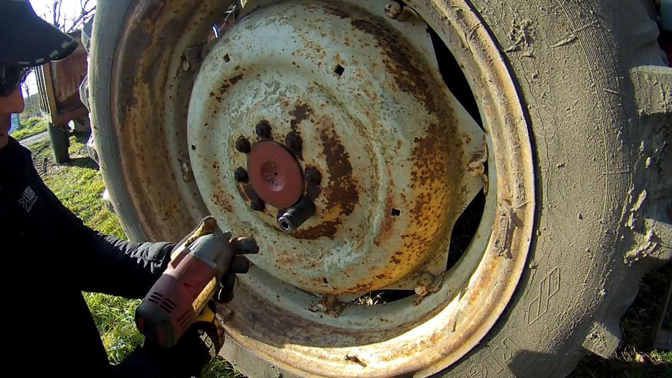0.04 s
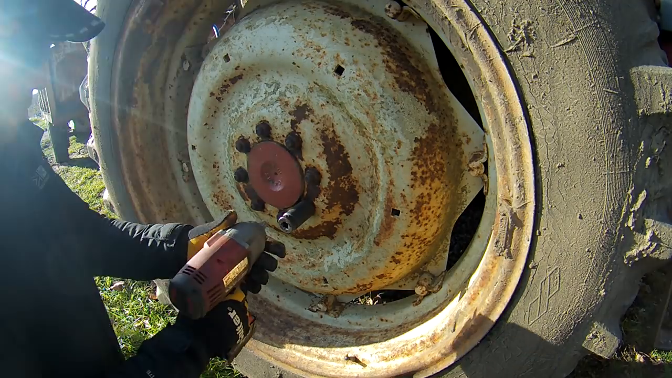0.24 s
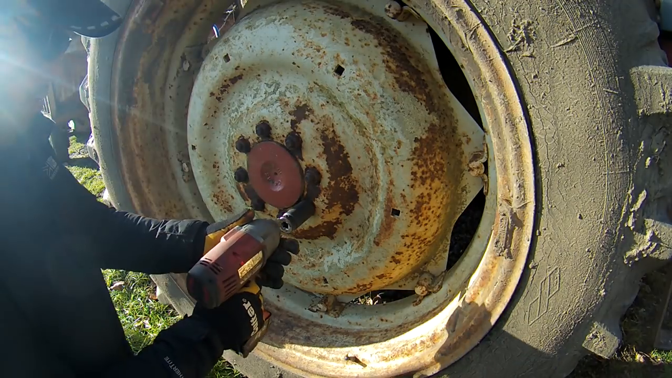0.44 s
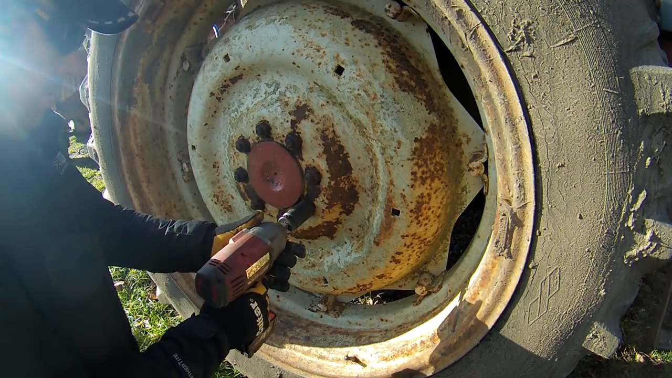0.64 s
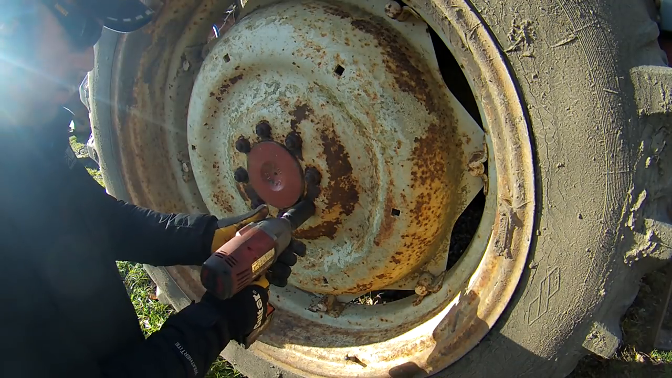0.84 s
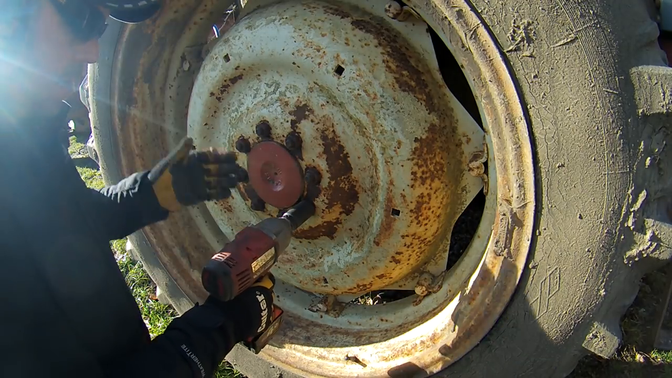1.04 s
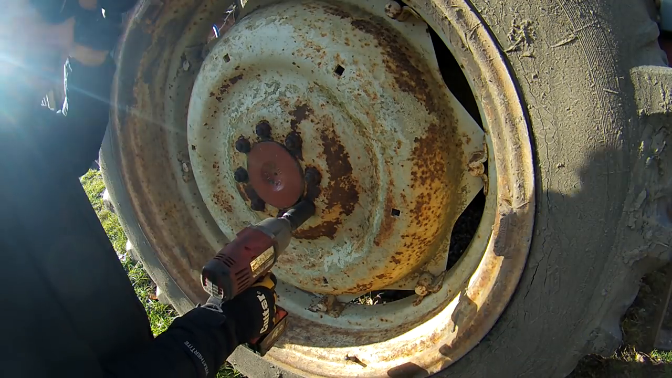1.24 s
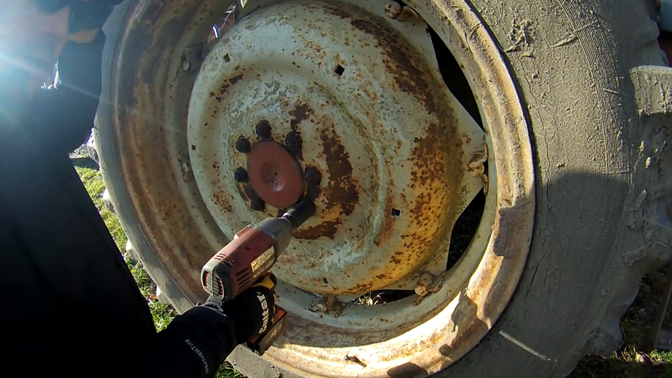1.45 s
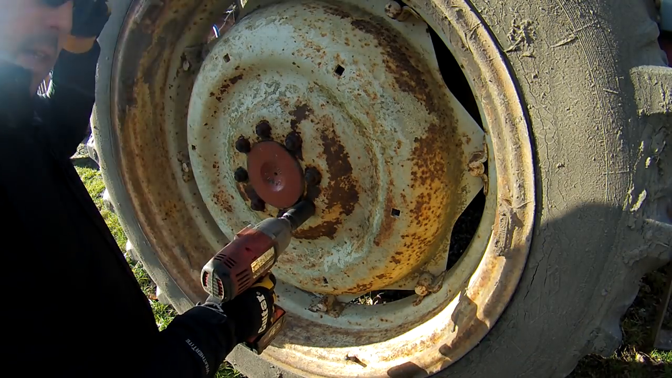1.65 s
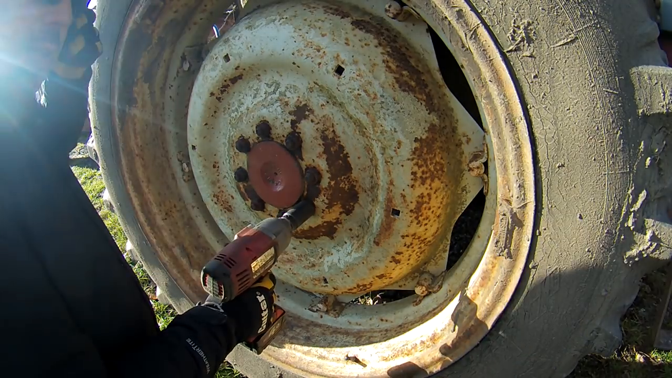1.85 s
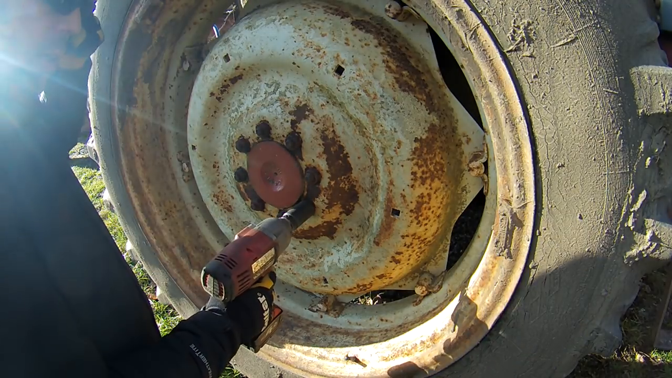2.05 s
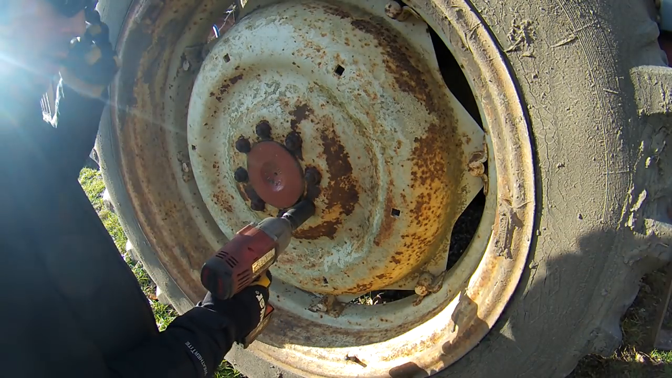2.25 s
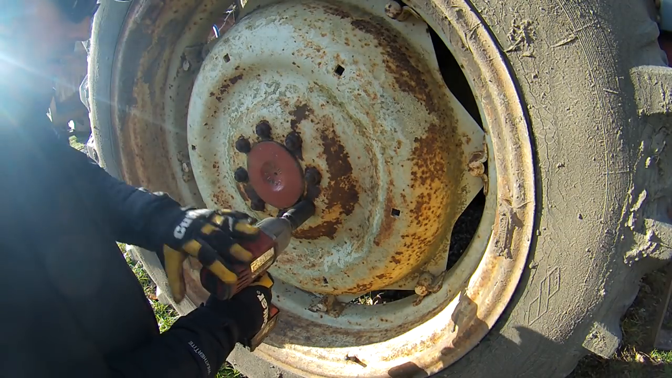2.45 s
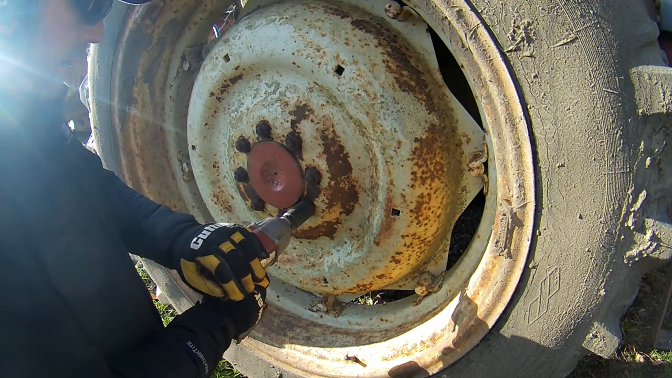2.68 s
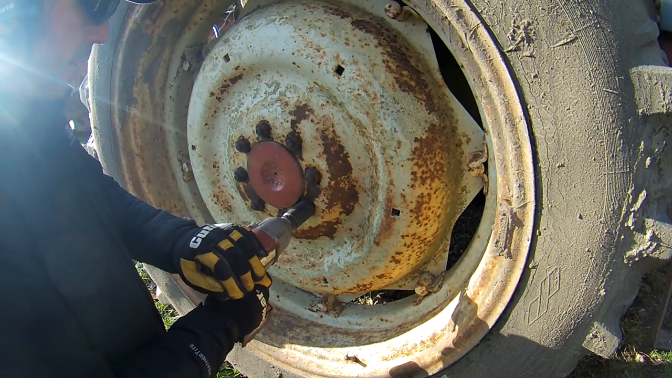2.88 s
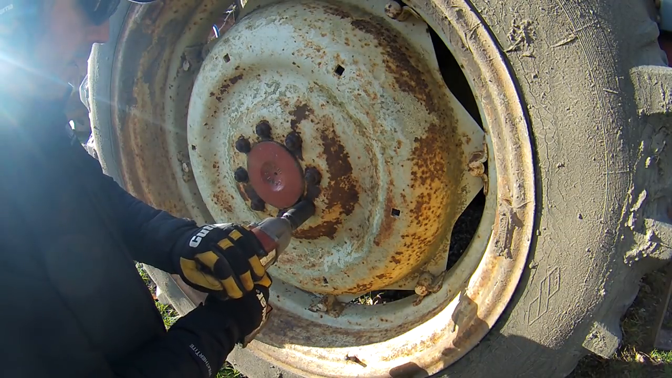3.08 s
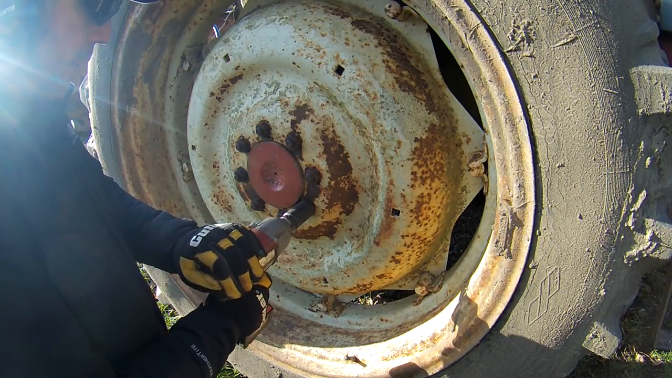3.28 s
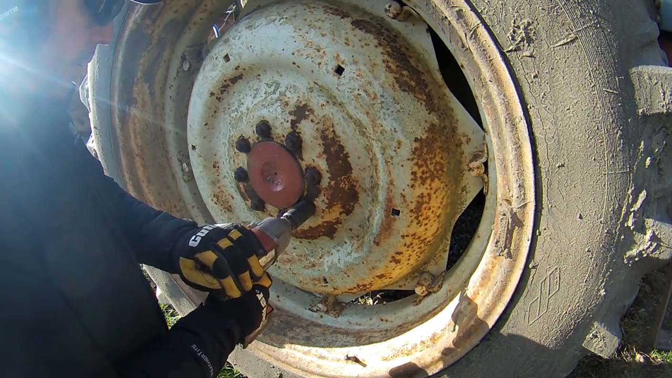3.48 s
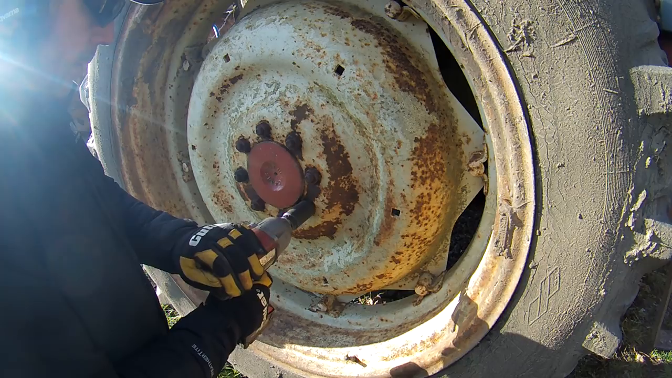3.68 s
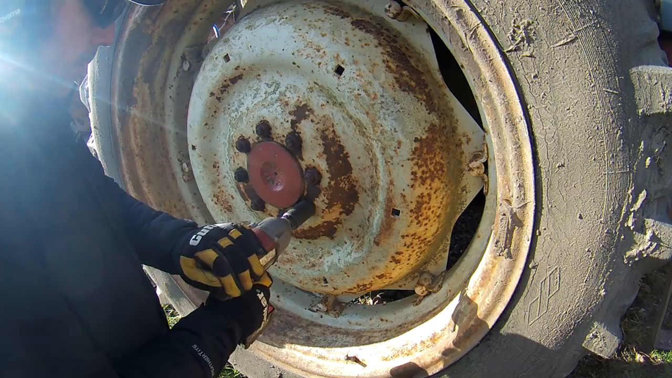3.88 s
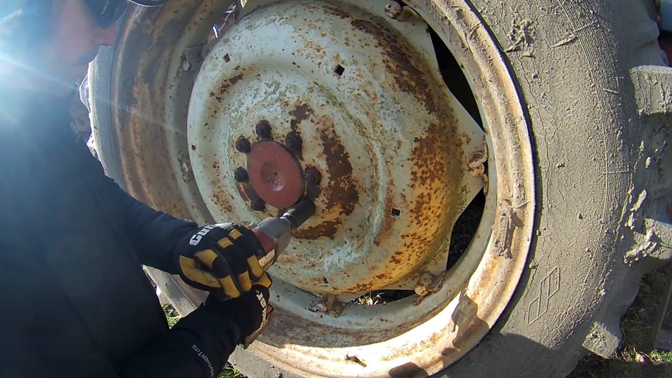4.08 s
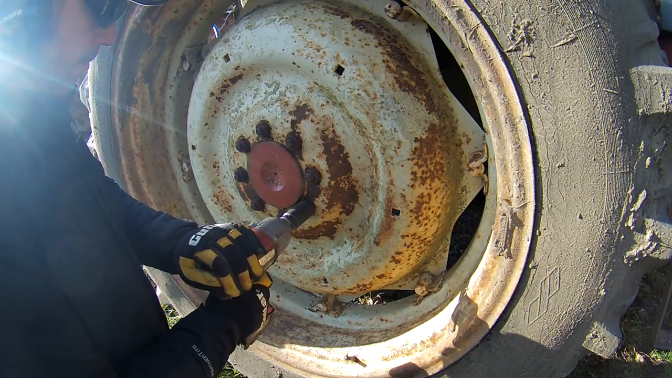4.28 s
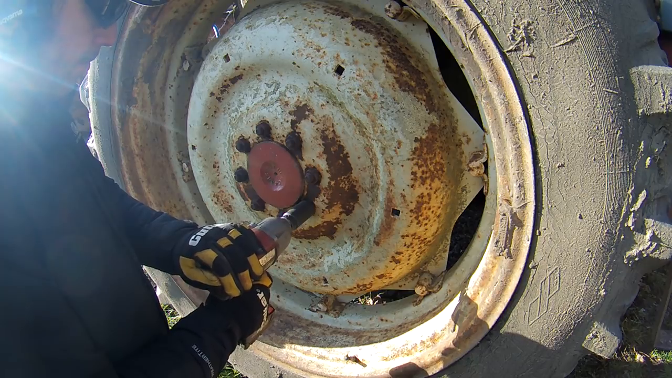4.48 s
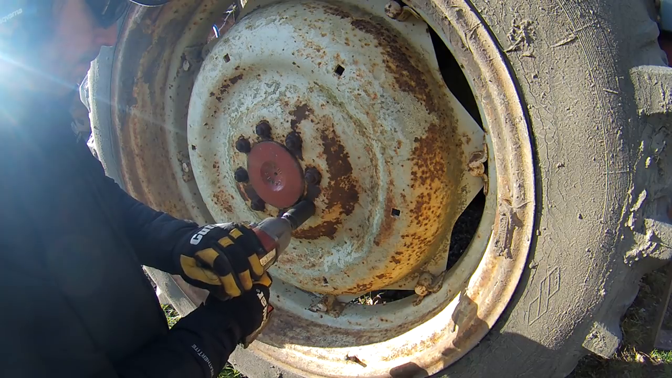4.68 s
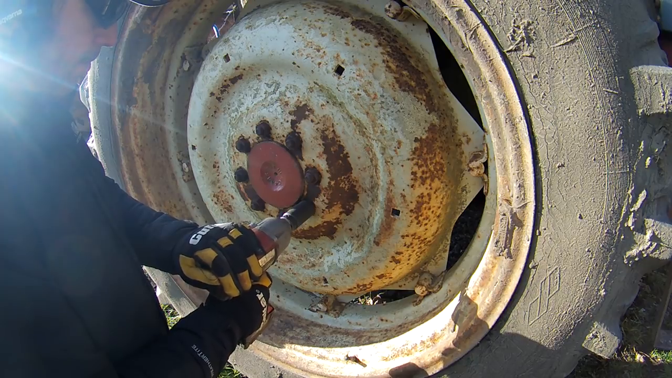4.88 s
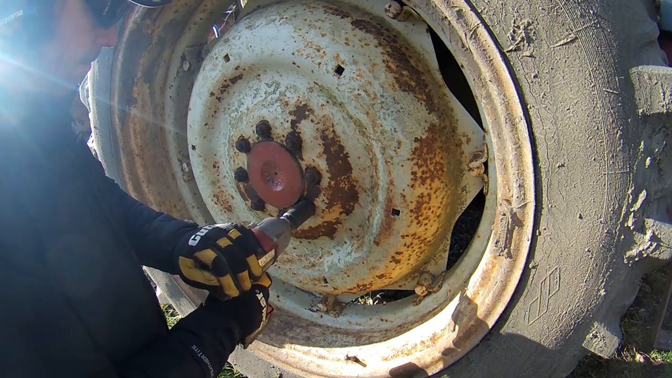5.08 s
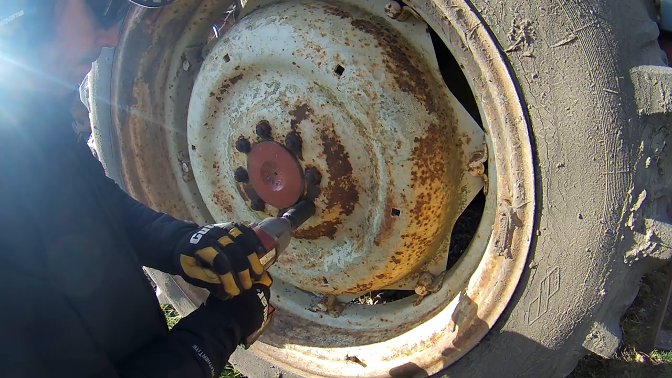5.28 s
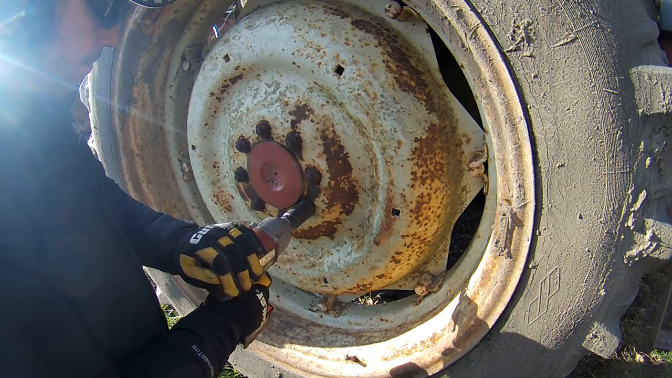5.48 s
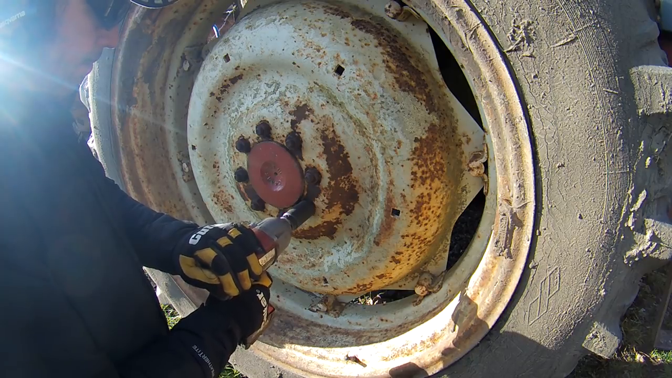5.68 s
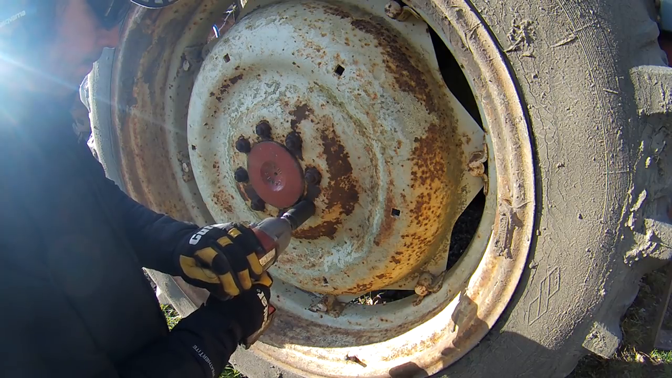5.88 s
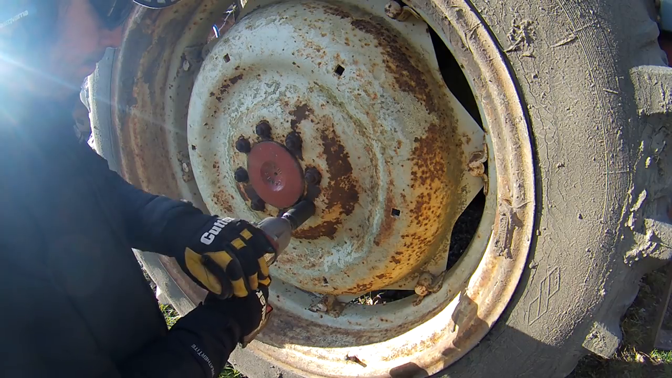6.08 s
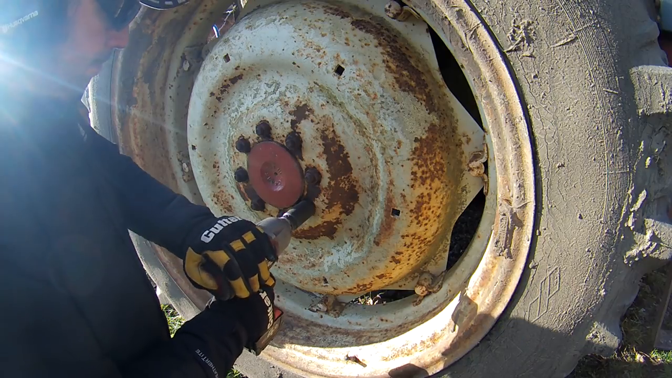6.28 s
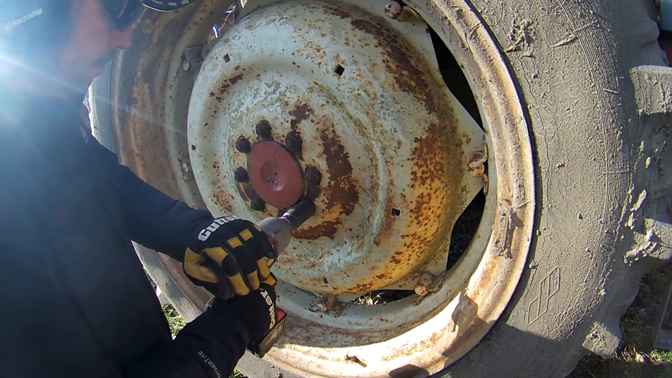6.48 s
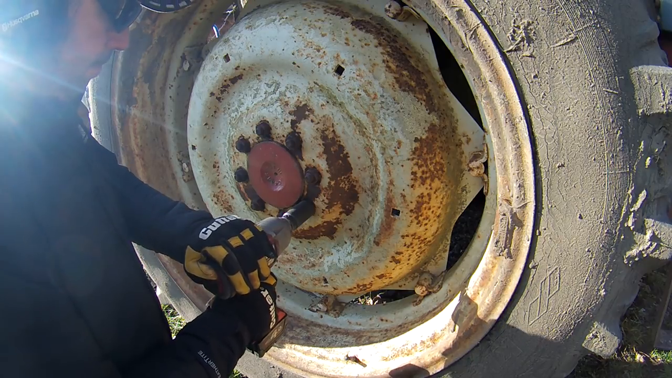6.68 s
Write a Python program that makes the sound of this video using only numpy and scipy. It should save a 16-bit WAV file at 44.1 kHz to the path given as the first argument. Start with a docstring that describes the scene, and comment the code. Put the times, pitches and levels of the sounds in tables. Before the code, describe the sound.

A few steel ticks and scrapes as a socket finds a nut, then an impact wrench hammers hard and steadily on a big metal wheel.

```python
"""A few steel ticks and scrapes, then the hard, steady rattle of a cordless impact wrench on a big tractor wheel.
Each hammer turn throws a short series of steel contacts, noise bursts plus pushes, into wheel and tool resonances.
The fitting of the socket is scraped noise and taps through resonances of wheel and socket.
Wind, distant hum, tyre roar and rustle are coloured noise underneath; a small microphone clips the start of
the hammering until its gain control turns down."""
import sys
import numpy as np
from scipy import signal
from scipy.fft import rfft, irfft, next_fast_len
from scipy.io import wavfile
from scipy.ndimage import uniform_filter1d, map_coordinates

SR = 44100
rng = np.random.default_rng(int(sys.argv[2]) if len(sys.argv) > 2 else 0)


def file_out(sig):
    """Save sig as 16-bit WAV at sys.argv[1]."""
    # one column per channel
    cols = np.atleast_2d(sig).T
    # limit, then scale
    lim = np.clip(cols, -1, 1)
    pcm = np.round(lim * 32767).astype(np.int16)
    wavfile.write(sys.argv[1], SR, pcm)


N = 296917

# All levels are relative dB inside the mix, ahead of the gain control.
# Contacts of the rebound in a hammer turn. Each row: time after the turn starts in ms, grit in dB,
# fall by 60 dB in ms, time scatter in ms, thump in dB, knock in dB, clack in dB.
REBOUND_CONTACTS = [(-.5, 0, 45, .2, -3, -6, -12), (3.2, -2, 45, .4, -8, -5, -9)]
# Contacts of the blow itself. Each row: time after the turn starts in ms, grit in dB,
# fall by 60 dB in ms, time scatter in ms, thump in dB, knock in dB, clack in dB.
BLOW_CONTACTS = [(7.0, -6, 40, .3, -8, -9, -1), (10.2, -.5, 35, .25, -5, -1, -8),
                 (12.4, 0.5, 36, .15, 0, 2, 1), (12.6, 3, 9, .15, -30, -30, -30),
                 (14.2, -2, 8, .6, -30, -30, -30), (15.8, -3.5, 34, .5, -3, -5, -10),
                 (18.6, -8, 22, .5, -5, -14, -16), (22.6, -20, 20, .5, -14, -8, -12)]
# Broad colour of the contacts. Each row: frequency in Hz, density in dB per Hz.
CLATTER_COLOUR = [(35, -67), (60, -25), (140, -27), (182, -25), (225, -20), (387, -16), (730, -16.5),
                  (1100, -11), (1480, -9.5), (2080, -14), (4200, -11), (5400, -9), (6800, 0), (8200, 4),
                  (10500, -7), (12800, -13), (14000, -18.5)]
# The wheel's dish. Each row: resonance in Hz, width in Hz, level in dB.
DISH_MODES = [(119, 21.2, 13.5), (134, 9.3, -11), (245.5, 43, 5), (474, 40, 7), (515, 23, 3.5),
              (568, 130, 0), (831, 23, 3.5), (1244, 17, 0.5), (1478, 65, -.5), (1630, 50, 0),
              (1748, 44, -4), (1803, 29, 0), (1890, 45, 3), (3210, 300, -12.5), (3445, 60, -6)]
# The wheel's bell-like rim. Each row: resonance in Hz, width in Hz, level in dB.
RIM_MODES = [(1187, 14, 16)]
# The rim rings longer while the tool is not pressed on. Each row: resonance in Hz, width in Hz, level in dB.
FREE_RIM_MODES = [(1187, 9, 19)]
# The tool's anvil and housing. Each row: resonance in Hz, width in Hz, level in dB.
TOOL_MODES = [(6908, 36, 0), (7895, 36, -1), (8790, 60, -5), (10146, 32, 0), (10627, 45, -4),
              (11093, 36, -3), (11400, 45, -4), (11910, 30, -2), (12562, 40, -5), (12880, 70, -4)]
# Short knock, then clack, of lug on lug. Each row: resonance in Hz, width in Hz, level in dB.
LUG_MODES = [(1620, 950, 21), (3330, 2050, 23.5)]
# The hammer drifts against a steady beat. Each row: time in seconds, lag in ms.
BEAT_DRIFT = [(2.82, .6), (3.23, 1.7), (4.3, 1.6), (4.9, 2.6), (5.16, 2), (5.44, .1), (5.9, 0), (6.13, -.9),
              (6.3, -3.2), (6.73, -2.2)]
# How strongly the wheel rings. Each row: time in seconds, dish in dB, rim in dB.
WHEEL_RINGING = [(2.462, 9, -4), (2.52, 5.5, 14.5), (2.68, 5.5, 10.5), (2.72, 5, 4.5), (2.8, 5, 8.5),
                 (3.1, 1.5, 5), (3.5, 5, 3), (3.83, 1, 1), (3.95, 4.5, 2.5), (4.3, -0.5, 2), (4.45, -1, -3),
                 (4.78, 1, 7), (5.0, -0.5, -1.5), (5.7, 3, 4), (6.17, 3, 4), (6.4, 5.5, -3), (6.73, 6, 2)]
# Colour of the gear train against the contacts. Each row: frequency in Hz, level in dB.
GEAR_COLOUR = [(300, -1.5), (4500, 4.5), (6500, -2.5), (9500, -2), (11500, 2.5)]
# Edges, in Hz, between the noise bands of the grit, each with its own random level curve.
GRIT_SPLITS_HZ = [2200, 3600, 5600, 10500]

# The socket finds the nut. Each row: start in seconds, tick in dB, fall of the scrape by 60 dB in ms,
# dish ring in dB, tap on the rim in dB, knock in dB.
FITTING_SCRAPES = [(0.532, -26, 36, -18, -20, -12), (0.537, -25, 37, -22, -20, -22),
                   (0.543, -30.5, 110, -27, -22, -21), (0.562, -40, 30, -21, 4, -22),
                   (0.579, -42, 53, -23.5, -25, -18), (0.642, -28, 58, -22, -10, -13),
                   (.717, -52, 33, -26, -10, -27), (.762, -24, 25, -24, -22, -7),
                   (.769, -18, 28, -26, -9, -3), (0.804, -25, 34, -33, -22, -13),
                   (0.815, -22, 35, -30, -25, -14), (.823, -20, 45, -27, -3, -2),
                   (0.855, -24, 15, -36, -23, -24)]
# Ring of the socket. Each row: resonance in Hz, width in Hz, level in dB.
SOCKET_MODES = [(3391, 60, -8), (4527, 200, -12), (2509, 80, -17), (1900, 90, -8), (1626, 90, -8)]
# The loose socket's clear note, struck by the first knock. Each row: resonance in Hz, width in Hz, level in dB.
SOCKET_BELL_MODES = [(3391, 9, 22.5)]
# Colour of the ticks. Each row: frequency in Hz, density in dB per Hz.
TICK_COLOUR = [(180, -50), (300, 3), (858, -11.5), (1370, -2.5), (2930, -17), (5160, -9.5), (7610, -0.5),
               (13000, -26), (14300, -45)]
# The tool thuds against the hub. Each row: resonance in Hz, width in Hz, level in dB.
HUB_MODES = [(127.7, 3.8, 2.5), (143, 13, -6)]

# Background; a gust passes as the work starts. Each row: time in seconds, wind in dB, rustle in dB.
AIR_LEVELS = [(0, -50, -48), (.2, -51.5, -54), (.55, -47, -55), (.8, -45, -49.5), (1.1, -51, -47.5),
              (1.45, -46.5, -56), (1.77, -48.5, -54), (1.85, -50, -55.5), (2.4, -45.5, -48),
              (2.7, -34, -53), (3.0, -40, -60), (4.2, -44, -62), (6.73, -46, -69)]
# Colour of the wind. Each row: frequency in Hz, density in dB per Hz.
WIND_COLOUR = [(8.8, -22), (15, 8), (38, 3.5), (113, -3.5), (162, -16.5), (292, -17), (326, -46),
               (400, -31), (520, -57), (880, -120)]
# Colour of the distant traffic hum. Each row: frequency in Hz, density in dB per Hz.
HUM_COLOUR = [(150, -1), (190, -5), (218, 9.5), (255, -2.5), (434, -5.5), (507, -2), (592, -3), (842, 0),
              (1150, -1.5), (1550, -5.5), (2100, -9.5), (3500, -17.5), (4550, -28), (7700, -120)]
# Colour of the leaves and clothes. Each row: frequency in Hz, density in dB per Hz.
RUSTLE_COLOUR = [(1180, -2.5), (2000, -1.5), (3200, -10.5), (3410, -7.5), (5200, -7), (8660, 1),
                 (12700, -16.5), (14300, -11)]
# Tyre roar in the traffic, a gliding band. Each row: time in seconds, centre in Hz, level in dB.
ROAR_GLIDE = [(0, 947, -58), (.3, 920, -62), (.65, 927, -53.5), (.95, 860, -59), (1.2, 903, -53),
              (1.45, 952, -53.5), (1.62, 1007, -52.5), (1.8, 924, -60), (2.1, 920, -66), (6.73, 945, -58)]

START_S, TURNS_PER_S = 2.462, 36.29
FIRST_TURN_DB, FIRST_REBOUND_DB, FIRST_LATE_MS = -14, 8, 2  # the first turn is weak, loose and late
FIRST_BLOW_S = START_S + FIRST_LATE_MS / 1000
REBOUND_FADE_DB_PER_S, REBOUND_SCATTER_DB = 1.63, 1.6
PUSH_SCATTER_MS, LOOSENS_MS_PER_S = .06, .035  # the pushes fall less evenly as the work goes on
GRIT_PATCHY_DB = 1.7
GEARS_DB, GEARS_START_DB, GEARS_SETTLE_S = -10.5, -0.5, 1  # start offset fades away over the settling time
FIRST_GEARS_DB = -4  # extra during the first turn
LEAD_IN_ON_S, LEAD_IN_TOP_S = 2.439, 2.457  # a short noise enters; it reaches its full level
LEAD_IN_DB, LEAD_IN_RISE_DB_PER_S = -24, 520
WHEEL_PUSH_DB, WHEEL_GRIT_DB = 4, -2  # the wheel takes more of the pushes and less of the grit than the air does
DISH_SWELL_DB = 2  # each dish resonance swells on its own as the socket rocks on the nut
RIM_EVENS, RIM_EVENS_S = .85, .04  # the tyre damps wide swings most: strength of the evening, averaging time
SEATED_S = .55  # from here the nut damps the socket
SOCKET_FREE_DB, SOCKET_SEATED_DB = 18, -11  # ring of the socket over the tick
BELL_STOPS_S, BELL_STOPS_DB_PER_S = .564, 1200  # a touch damps the clear note
HUM_DB, ROAR_WIDTH_HZ = -50, 220
STEP_S, STEP_TAKES_S, STEP_DB = 1.82, .025, -8  # the whole background drops a step
TOP_HZ = 14000  # upper limit of the microphone


def amp(db):
    """Turn dB into a linear amplitude factor."""
    return 10 ** (np.asarray(db) / 20)


def unit(x):
    """Bring x to an RMS of one."""
    return x / np.sqrt(np.mean(x ** 2) + 1e-20)


def curves(rows, t):
    """Read each column after the time at times t, in straight lines between rows."""
    s, *columns = np.transpose(rows)
    return [np.interp(t, s, column) for column in columns]


def filtered(x, response):
    """Filter x by a complex response of frequency, padded so tails do not wrap round."""
    m = next_fast_len(N + SR // 2)
    return irfft(rfft(x, m) * response(np.fft.rfftfreq(m, 1 / SR)), m)[..., :N]


def colour(points):
    """Causal minimum-phase response through (Hz, dB) points on a log axis, with a floor at -90 dB."""
    f, db = np.transpose(points)

    def response(hz):
        level_db = np.interp(np.log(hz + 1), np.log(f + 1), db)
        cepstrum = irfft(np.log(amp(np.maximum(level_db, -90))))
        half = len(cepstrum) // 2
        cepstrum[1:half] *= 2  # fold the second half onto the first
        cepstrum[half + 1:] = 0
        return np.exp(rfft(cepstrum))
    return response


def resonance(f, centre, width, db):
    """One damped resonance, which peaks at its level in dB."""
    return amp(db) * 1j * f * width / (centre * centre - f * f + 1j * f * width)


def ringing(modes):
    """Causal sum of damped resonances."""
    return lambda f: sum(resonance(f, *mode) for mode in modes)


def wobble(rate):
    """A smooth random curve with rate knots a second."""
    knots = rng.standard_normal(int(N * rate / SR) + 4)
    return map_coordinates(knots, [np.arange(N) * rate / SR])


def bursts(s, db, t60_s, rise_s):
    """Summed envelopes that rise quickly at times s and die away exponentially."""
    t = np.arange(SR // 12) / SR
    decay = amp(db[:, None] - 60 * t / np.reshape(t60_s, (-1, 1)))
    shape = decay * (1 - np.exp(-t / rise_s))
    at = (s[:, None] * SR).astype(int) + np.arange(len(t))
    return np.bincount(at.ravel(), shape.ravel(), N + SR)[:N]


def wrench():
    """Gritty contacts, gears, lead-in and pushes sound through the air and ring the wheel and tool."""
    power, pushes = hammer_turns()
    thin = lambda hz: (1j * hz / (500 + 1j * hz)) ** 2  # small sliding contacts move little bass
    strikes = filtered(unit(np.sqrt(power) * grit() + gears()), thin)
    sharp = push_sound(pushes)
    airborne = strikes + lead_in() + sharp
    into_wheel = amp(WHEEL_GRIT_DB) * strikes + amp(WHEEL_PUSH_DB) * sharp
    force, drive = filtered(np.array([airborne, into_wheel]), colour(CLATTER_COLOUR))
    force, drive = np.array([force, drive]) / np.std(force)
    tool = amp(1) * filtered(force, ringing(TOOL_MODES))
    return amp(-10.0) * (force + wheel(drive) + tool)


def hammer_turns():
    """Contacts repeat turn after turn: power envelope of the grit, and impulses for thump, knock and clack."""
    beat = np.arange(START_S, N / SR, 1 / TURNS_PER_S)
    first = beat == START_S
    worked_s = beat - START_S
    effort_db = FIRST_TURN_DB * first
    rebound_db = FIRST_REBOUND_DB * first - REBOUND_FADE_DB_PER_S * worked_s
    rebound_db = rebound_db + REBOUND_SCATTER_DB * rng.standard_normal(len(beat)) * ~first
    beat = beat + (curves(BEAT_DRIFT, beat)[0] + FIRST_LATE_MS * first) / 1000
    push_scatter_ms = PUSH_SCATTER_MS + LOOSENS_MS_PER_S * (beat - START_S)
    power, pushes = np.zeros(N), np.zeros((3, N + SR))
    for contacts, extra_db in ((REBOUND_CONTACTS, rebound_db), (BLOW_CONTACTS, 0)):
        for k, (ms, grit_db, t60_ms, scatter_ms, *push_db) in enumerate(contacts):
            chance = rng.standard_normal((len(beat), 6))
            s = beat + ms / 1000
            size_db = effort_db + extra_db + 1.2 * chance[:, 0]
            grit_s = s + scatter_ms * chance[:, 1] / 1000
            power += bursts(grit_s, size_db + grit_db, t60_ms / 1000, rise_s=.0003) ** 2
            at = ((s + push_scatter_ms * chance[:, 2] / 1000) * SR).astype(int)
            scatter_db = [[1.8], [2.5], [2.5]] * chance[:, 3:].T
            # successive contacts push in opposite directions
            pushes[:, at] += (-1) ** k * amp(size_db + np.c_[push_db] + scatter_db)
    return power, pushes[:, :N]


def grit():
    """Noise in several bands, each with its own random level curve, with a shared flutter."""
    bands = lambda hz: np.searchsorted(GRIT_SPLITS_HZ, hz) == np.c_[range(len(GRIT_SPLITS_HZ) + 1)]
    split = filtered(rng.standard_normal(N), bands)
    patchy = sum(band * amp(GRIT_PATCHY_DB * wobble(45)) for band in split)
    return patchy * amp(0.41 * wobble(900) + 1.2 * wobble(350))


def push_sound(pushes):
    """Each push is a heavy low thump plus the short knock and clack of lug on lug."""
    slow = lambda hz: amp(25.0) / (1 + 1j * hz / 500) ** 2  # a thump lasts a few tenths of a millisecond
    responses = lambda hz: np.array([slow(hz)] + [resonance(hz, *mode) for mode in LUG_MODES])
    return filtered(pushes, responses).sum(axis=0)


def gears():
    """The gear train grinds between contacts: fluttering coloured noise from the first blow on."""
    t = np.arange(N) / SR
    settling_db = GEARS_START_DB * np.exp(-np.abs(t - START_S) / GEARS_SETTLE_S)
    level = amp(GEARS_DB + settling_db + 1.53 * wobble(60)) * (t > FIRST_BLOW_S)
    level = level * amp(FIRST_GEARS_DB * (t < START_S + 1 / TURNS_PER_S))
    return filtered(level * rng.standard_normal(N), colour(GEAR_COLOUR))


def lead_in():
    """A short fluttering noise rises steeply just before the first blow."""
    t = np.arange(N) / SR
    level = amp(LEAD_IN_DB + LEAD_IN_RISE_DB_PER_S * np.minimum(t - LEAD_IN_TOP_S, 0))
    sounding = (t > LEAD_IN_ON_S) * (t < FIRST_BLOW_S)
    return level * sounding * amp(1.6 * wobble(300)) * rng.standard_normal(N)


def wheel(drive):
    """The drive rings the swelling dish resonances and the rim, whose swings are evened out."""
    dish_db, rim_db = curves(WHEEL_RINGING, np.arange(N) / SR)
    rim = filtered(drive, ringing(RIM_MODES))
    swing = np.abs(uniform_filter1d(rim ** 2, round(RIM_EVENS_S * SR))) / np.mean(rim ** 2)
    rim = rim / (swing + .1) ** (RIM_EVENS / 2)
    responses = lambda hz: np.array([resonance(hz, *mode) for mode in DISH_MODES])
    modes = filtered(drive * amp(dish_db - 1.0), responses)
    dish = sum(mode * amp(DISH_SWELL_DB * wobble(9)) for mode in modes)
    return dish + rim * amp(rim_db)


def fitting():
    """Short scrapes of steel on steel: a bright tick, the rings of wheel and socket, a dull knock."""
    s, tick_db, t60_ms, dish_db, rim_db, knock_db = np.transpose(FITTING_SCRAPES)
    white = rng.standard_normal((3, N))
    scrape = lambda level_db, k: bursts(s, level_db, t60_ms / 1000, rise_s=0.00056) * white[k]
    ticks = filtered(scrape(tick_db, 0), colour(TICK_COLOUR))

    rim_taps, bell_tap = np.zeros((2, N))
    rim_taps[(s * SR).astype(int)] = amp(rim_db)
    bell_tap[int(s[0] * SR)] = 1
    # the three lowest and two highest dish resonances stay silent, and the bass is thinned
    dish_response = lambda hz: ringing(DISH_MODES[3:-2])(hz) * 1j * hz / (1500 + 1j * hz)
    dish = filtered(scrape(dish_db + 2.5, 1), dish_response)
    rim = filtered(rim_taps, ringing(FREE_RIM_MODES))

    socket_db = tick_db + np.where(s < SEATED_S, SOCKET_FREE_DB, SOCKET_SEATED_DB)
    socket = filtered(scrape(socket_db, 2), ringing(SOCKET_MODES))
    stops = amp(-BELL_STOPS_DB_PER_S * np.maximum(np.arange(N) / SR - BELL_STOPS_S, 0))
    bell = stops * filtered(bell_tap, ringing(SOCKET_BELL_MODES))
    knock = filtered(bursts(s, knock_db, 0.01, rise_s=0.002), ringing(HUB_MODES))
    return ticks + dish + rim + socket + bell + knock


def air():
    """Wind buffets the microphone in lumps; far traffic hums and roars; leaves and clothes rustle."""
    t = np.arange(N) / SR
    wind_db, rustle_db = curves(AIR_LEVELS, t)
    noise = lambda points: filtered(rng.standard_normal(N), colour(points))
    wind = amp(wind_db) * unit(noise(WIND_COLOUR) * amp(1.5 * wobble(12)))
    hum = amp(HUM_DB + 0.73 * wobble(10.28)) * unit(noise(HUM_COLOUR))
    rustle = amp(rustle_db + 0.61 * wobble(9.7)) * unit(noise(RUSTLE_COLOUR))
    step = amp(STEP_DB * np.clip((t - STEP_S) / STEP_TAKES_S + .5, 0, 1))
    return step * (tyre_roar() + wind + hum + rustle)


def tyre_roar():
    """Two slow random curves on a gliding cosine and sine make a narrow band of noise."""
    roar_hz, roar_db = curves(ROAR_GLIDE, np.arange(N) / SR)
    phase = 2 * np.pi * np.cumsum(roar_hz) / SR
    band = wobble(ROAR_WIDTH_HZ) * np.cos(phase) + wobble(ROAR_WIDTH_HZ) * np.sin(phase)
    return amp(roar_db) * unit(band)


def scene():
    """Mix the wrench, the fitting of the socket and the open air into one channel."""
    return (wrench() + fitting() + air())[None]


def record(dry):
    """A slow gain control follows the loudness; until it catches up the input stage clips."""
    smooth = lambda x, seconds: signal.lfilter([1 / (seconds * SR)], [1, 1 / (seconds * SR) - 1], x)
    loudness = smooth(dry ** 2, .05)
    wanted_db = -6.4 * np.log10(1 + loudness / amp(-26) ** 2)
    turned = dry * amp(smooth(wanted_db, 0.2))
    clipped = turned / (1 + np.abs(turned / .25) ** 8) ** (1 / 8)  # rounded limit at .25
    return filtered(clipped, lambda hz: 1 / (1 + (hz / TOP_HZ) ** 200))


dry = scene()
out = record(dry)
file_out(out)
```